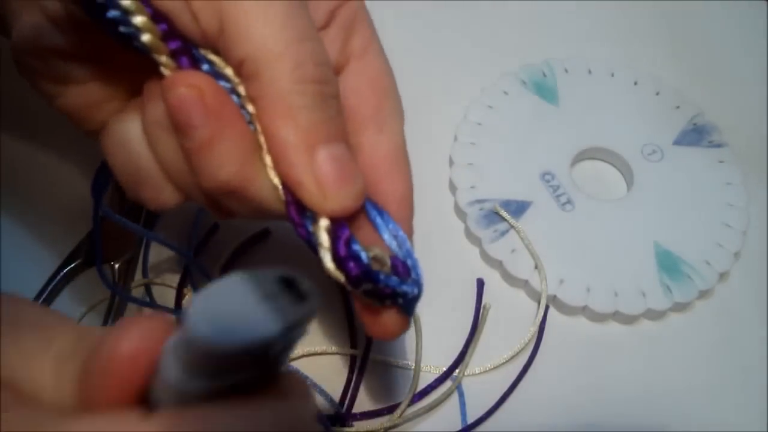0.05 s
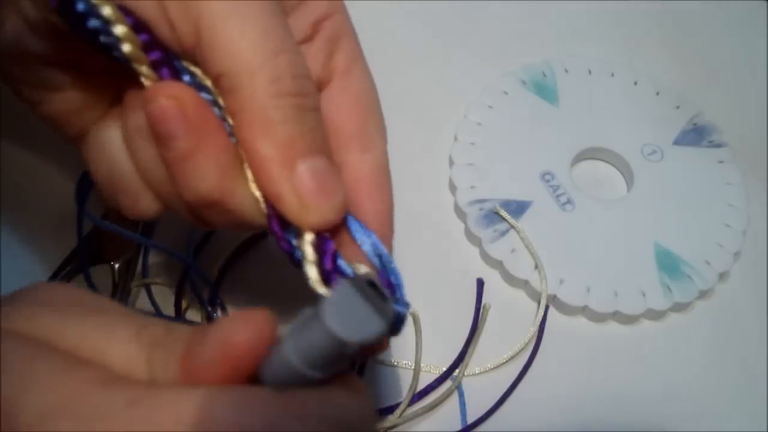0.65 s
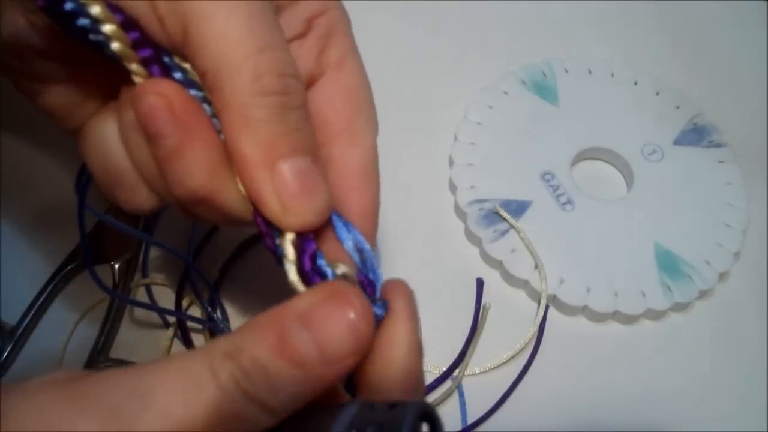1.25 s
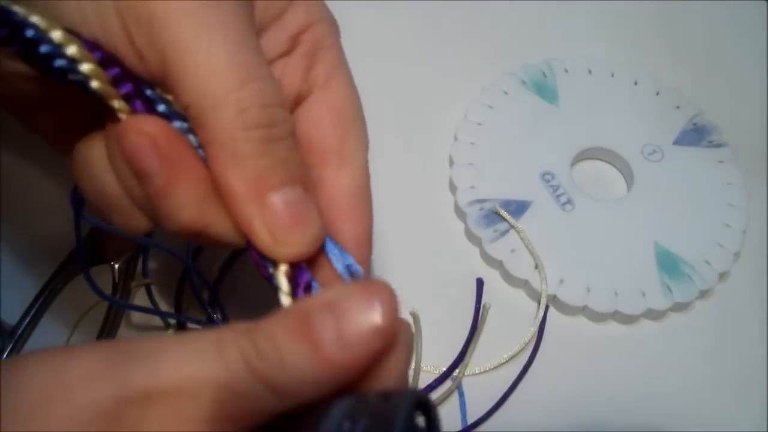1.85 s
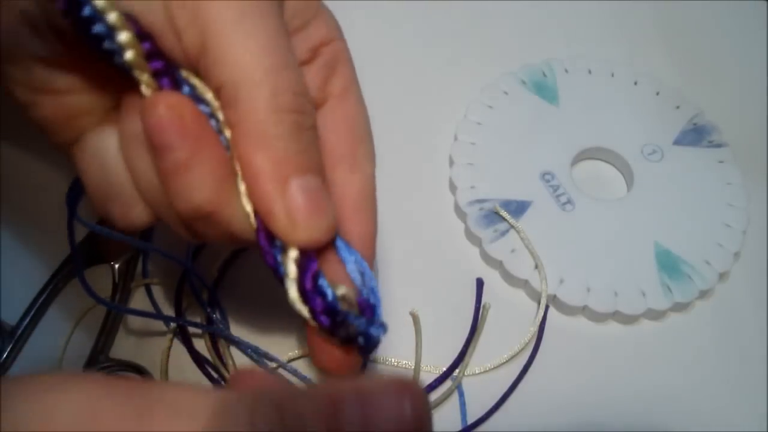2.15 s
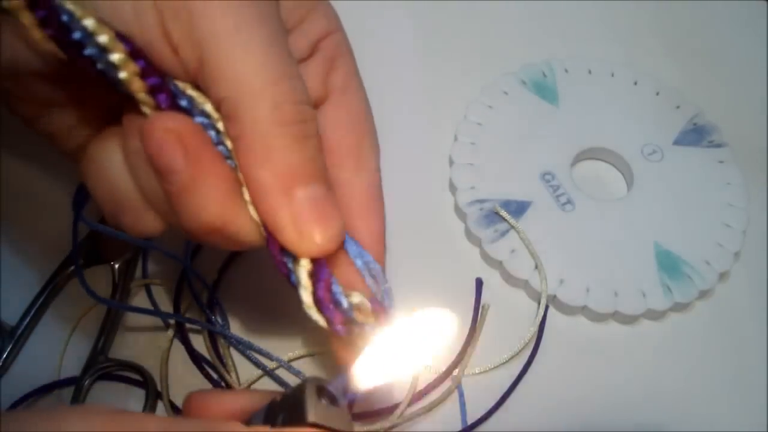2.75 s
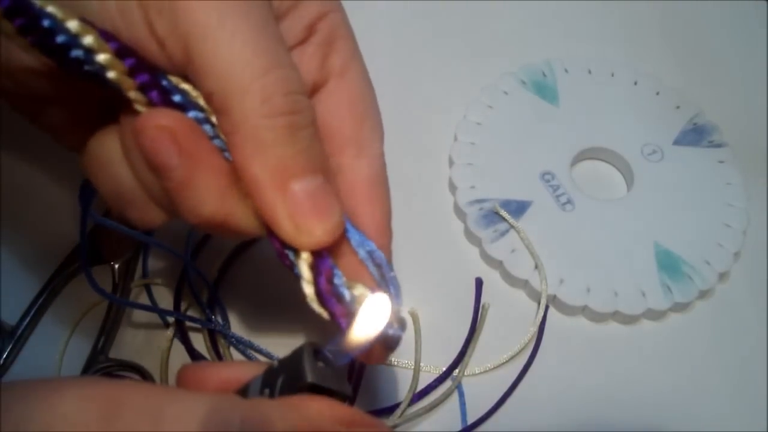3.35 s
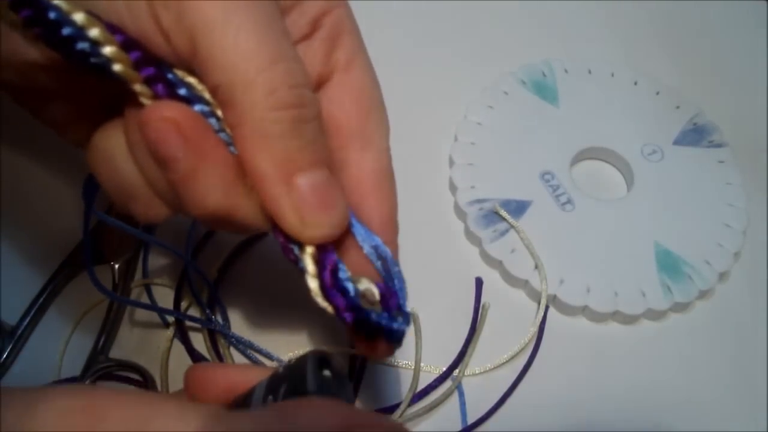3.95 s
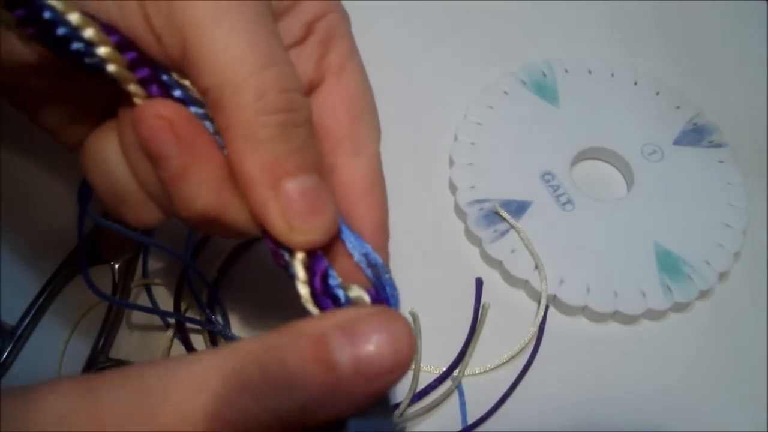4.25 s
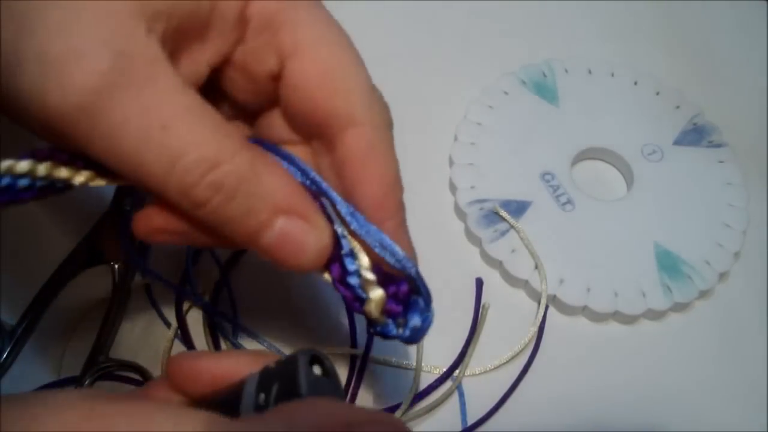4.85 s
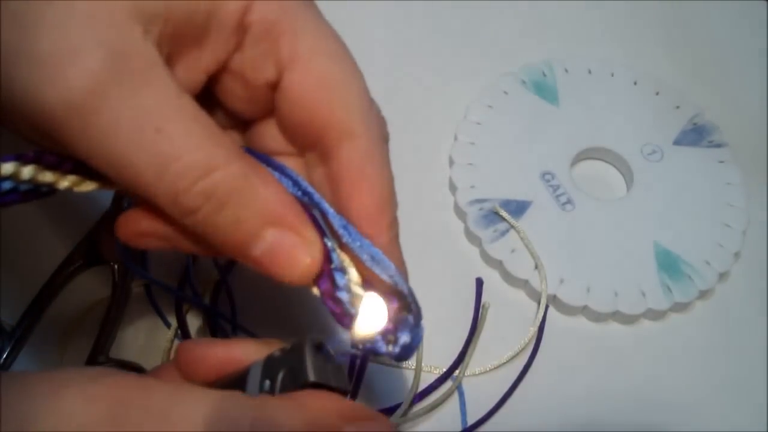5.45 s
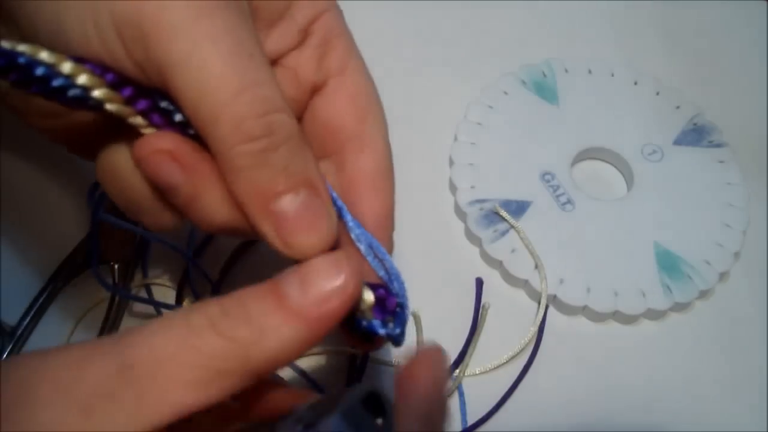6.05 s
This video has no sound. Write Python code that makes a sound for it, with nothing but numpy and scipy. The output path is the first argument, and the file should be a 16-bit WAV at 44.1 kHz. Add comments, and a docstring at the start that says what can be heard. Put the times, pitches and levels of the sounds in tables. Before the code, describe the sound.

A lighter ticks in the fingers and snaps alight twice, each time catching with a soft puff before its lever clicks back.

```python
"""Over the hush of a small room, a plastic case ticks and rubs in the fingers close to the microphone:
a piezo lighter, used to melt the ends of a braided cord. Twice the valve releases a hissing jet, the
igniter's hammer strikes its crystal hard enough to overload the microphone, the gas catches with a soft
puff, and a spring clicks the lever back up. The impacts sound through the resonances of the body,
the rubs through stick-slip friction, and the flame through the air it displaces."""
import sys
import numpy as np
from scipy import signal
from scipy.fft import rfft, irfft, next_fast_len
from scipy.io import wavfile

SR = 44100
rng = np.random.default_rng(int(sys.argv[2]) if len(sys.argv) > 2 else 0)


def dump(signal):
    """Clip the signal to [-1, 1] and save it as 16-bit WAV at the path in sys.argv[1]."""
    limited = np.clip(np.atleast_2d(signal).T, -1, 1)
    pcm = np.round(limited * 32767).astype(np.int16)
    wavfile.write(sys.argv[1], SR, pcm)


N = 268657
TIME = np.arange(N) / SR
AGE = TIME[:SR // 2]   # time since the onset of one short sound

# knocks of the case in the hand: start_s, level_db, low_mid_db, treble_db, rattle_db, resonance_hz
CASE_KNOCKS = [(0.2233, -41, 5, 1, 2, 4900), (0.2291, -35.5, -1, 3.5, 1, 4570),
               (0.3348, -43, 2.5, 0, 3, 2230), (0.4732, -43.5, 3, -13, -11, 4320),
               (0.501, -25, -2.5, 3, 3, 4630), (0.5349, -43, -4, -4, -14, 5070),
               (0.5736, -43, -2, -3, -5, 4410), (0.5916, -40.5, -1, -17, -0.5, 4900),
               (0.676, -33, 0, 0.5, -7, 4630), (0.715, -23, -2, 3.5, 0, 2140),
               (0.7425, -38, -15, -16, -6, 5030), (0.7632, -40, 9, -14, -12, 2850),
               (0.8776, -31.5, -4, -1, -1.5, 4600), (0.9072, -22, 1, 3.5, -2, 2290),
               (0.9656, -40, 13, -2, -5, 2740), (0.9787, -40.5, 5, 5, -4, 4960),
               (1.031, -42.5, 0, 4, 8, 4070), (1.0377, -34.5, 4.5, 4, 0, 6030),
               (1.0519, -26.5, -5.5, -2, 0, 6900), (1.6921, -46, 5, 5.5, -2, 4800),
               (1.9701, -28.5, -3, 6, -0.5, 4340), (1.997, -42.5, -2, -3, 1.5, 4770),
               (2.1484, -49, 11, -1, -20, 2330), (2.1685, -39, -9, 5, -3, 4200),
               (2.2588, -40, -8, 0.5, -6, 5160), (2.3584, -39.5, 2, -8, -6, 2420),
               (2.5756, -41, 0.5, -2, -11, 2730), (2.6155, -48.5, 10, -6, -7, 2950),
               (2.6421, -37.5, 16, -13, -2, 2720), (3.0007, -43.5, 5, -10, -4, 3420),
               (3.0094, -27.5, -0.5, 0.5, -2.5, 6440), (3.2415, -49.5, 13, -3.5, -3.5, 2230),
               (4.1361, -24.5, 1.5, -5, -4, 3070), (4.1383, -24.5, 2.5, -3.5, -4, 5210),
               (4.1545, -36, -7, 1, -8, 4930), (4.298, -40, 9, -7.5, -15, 3280),
               (4.375, -47, 11.5, -9.5, -21, 2430), (4.483, -38.5, 2.5, -9.5, -10.5, 3400),
               (4.6625, -36, 9, 4, -6, 2670), (4.682, -40, -3, -1.5, 1.5, 5020),
               (4.792, -39.5, -2.5, -7, -2, 5350), (5.0297, -46, 6, -2, 1.5, 4900),
               (5.407, -29.5, 0.5, -1, -4, 2300), (6.058, -35.5, -15, -16, -14, 5120),
               (6.0742, -39, 0, -3, -8, 5040), (6.0884, -29.5, -2, -1, 0, 3420)]
# touches on the metal hood: start_s, gain_db
HOOD_TOUCHES = [(0.23, -4), (1.048, 14)]
# fingers sliding on the case: peak_s, level_db, length_s, rasp_hz
FINGER_RUBS = [(0.322, -56.5, 0.18, 2400), (0.56, -60, 0.13, 4900), (0.78, -60, .2, 4300),
               (0.91, -32.5, 0.013, 2940), (1.0, -58, 0.21, 5000), (1.505, -54, 0.14, 2300),
               (1.83, -59.5, .3, 2350), (1.99, -54, 0.078, 4800), (2.18, -60.5, 0.47, 2380),
               (2.26, -53, 0.043, 5000), (2.376, -39, 0.053, 5000), (2.673, -50, 0.22, 2935),
               (3.22, -69.5, .5, 2245), (4.674, -42, .075, 4906), (4.796, -52.5, .065, 5240),
               (5.035, -58, .06, 2400), (5.092, -49.5, .14, 3410), (6.085, -47, .14, 3400)]
# fingertips pinching the frayed cord: peak_s, level_db, length_s
CORD_PINCHES = [(1.3, -56, .36), (1.44, -57.5, 0.12), (1.69, -63, .3), (1.975, -51, 0.076),
                (2.37, -44.5, 0.11)]
# openings of the gas valve: start_s, spit_db, spit_t60_s, surge_db, surge_t60_s
VALVE_OPENINGS = [(2.7165, -32.5, .06, -46.5, .18), (5.1312, -28, 0.032, -56.5, .7)]
# hammer blows and the mode the grip leaves free: start_s, level_db, t60_s, mode_hz, mode_db
HAMMER_STRIKES = [(2.8133, 5, 0.036, 6320, -11), (5.2565, 6.5, 0.038, 2230, -16.5)]
# pops of catching gas: start_s, level_db, brightness_hz
IGNITION_POPS = [(2.8489, -21, 600), (2.855, -29.5, 600), (2.8636, -30, 900), (5.306, -35.5, 451),
                 (5.3152, -33.5, 500)]
# oscillations of the young flame: start_s, level_db, pitch_hz, t60_s
FLAME_FLUTTER = [(2.846, -51.5, 69.6, 0.44), (5.306, -31.5, 60, 0.4), (5.308, -33.5, 101, 0.3)]
# air moved as the flame catches, leans on the cord or goes out: peak_s, level_db, length_s
FLAME_GUSTS = [(2.89, -56, .25), (3.22, -57.5, .25), (4.068, -43.5, .085), (5.318, -45.5, .08),
               (5.455, -53, .2), (6.015, -52, 0.077)]
# returns of the lever: start_s, level_db, low_mid_db, treble_db, rattle_db
LEVER_RETURNS = [(4.0653, -14.5, 0.5, -2, -3.5), (6.0029, -11, 1, -1.5, -9.5)]

# steady background hum: pitch_hz, rms_db
HUM_TONES = [(225, -72), (54.2, -80)]
# modes of the metal hood: pitch_hz, level_db, t60_s
METAL_HOOD_MODES = [(4120, -40, .075), (4950, -42, .04), (6950, -43, .045), (7150, -35, .022),
                    (7450, -36, .02), (11900, -44, .025)]
# modes of the whole lighter: pitch_hz, level_db, t60_s
BODY_MODES = [(2200, -5, .06), (2480, -5, .025), (3245, -5, .06), (3420, -5, .06), (4140, -1, .06),
              (4298, 1, .05), (4550, -3, .05), (5110, -4, .05), (5400, -2, .06), (5650, -4, .06),
              (6195, -3, .05), (6740, -4, .06), (9600, -7, .05), (9850, -7, .05), (11600, -8, .05)]
# hollow ring after a pop: pitch_hz, level_db, t60_s
POP_MODES = [(268, -16.5, 0.067), (315, -21, .12), (368, -19.5, 0.14)]
# modes of the lever, damped by the thumb: pitch_hz, level_db, t60_s
DAMPED_LEVER_MODES = [(1550, -8, .02), (2300, -3, .025), (2520, 0, .03), (3350, -4, .025), (4300, -1, .035),
                      (5200, -2, .03), (5450, -1, .03), (9750, -7, .035), (10050, -10, .03)]
# low modes of the body, jolted as the lever stops: pitch_hz, level_db, t60_s
JOLT_MODES = [(150, -27, .04), (326, -36, 0.035)]

# noise spectrum of room and microphone: frequency_hz, density_db
HUSH_SPECTRUM = [(12, -30), (20, -2.5), (107, -6.5), (198, -9), (228, -5), (255, -10), (434, -11.5),
                 (513, -14.5), (574, -14.5), (897, -15.5), (976, -16), (1120, -16.5), (2260, -20),
                 (12400, -23.5), (16000, -25.5)]
# spectrum of the knocked case: frequency_hz, density_db
CASE_SPECTRUM = [(100, -22.5), (600, -26.5), (1200, -22.5), (1700, -12.5), (2300, -2.5), (3200, -5),
                 (4300, -4), (5300, 0), (6500, -8.5), (8500, -13.5), (11500, -5), (14000, -10),
                 (16000, -16)]
# spectrum of skin rubbing on plastic: frequency_hz, density_db
SKIN_SPECTRUM = [(100, -23), (1200, -21.5), (2300, -1.5), (3300, -0.5), (4200, -10), (5200, 1),
                 (6500, -7.5), (8500, -11.5), (12000, -10), (16000, -21)]
# spectrum of the cord's fibres: frequency_hz, density_db
FIBRE_SPECTRUM = [(100, -18), (1500, -14), (2400, -1), (5000, 6), (8000, -3), (12000, 3), (16000, -3)]
# spectrum of the valve's spit: frequency_hz, density_db
SPIT_SPECTRUM = [(100, -13), (700, -10.5), (1200, 1.5), (2300, 0.5), (3300, -11.5), (4800, -5), (6500, -11),
                 (9500, -10), (12300, 3), (14000, -2.5), (16000, -13.5)]
# spectrum of the gas jet: frequency_hz, density_db
JET_SPECTRUM = [(100, -40.5), (6000, -28), (10500, -16.5), (12400, -3), (13500, -10.5), (16000, -22)]
# spectrum of the hammer's chatter: frequency_hz, density_db
HAMMER_SPECTRUM = [(40, -23.5), (190, -23), (400, -15), (750, -27.5), (1100, -21.5), (1800, -14.5),
                   (2300, -9), (2900, -10), (3400, -3.5), (4300, 2.5), (5300, -2.5), (6700, 0.5),
                   (7800, -12.5), (9800, -4), (12000, -6.5), (16000, -12)]
# reverberation time of the room: frequency_hz, t60_s
ROOM_DECAY = [(150, 0.34), (1000, 0.067), (2500, .26), (5000, 0.26), (9000, .28), (15000, .22)]


def from_db(db):
    """Amplitude ratio of a level in decibels."""
    return 10 ** (np.asarray(db) / 20)


def unit(x):
    """Normalisation to rms 1."""
    return x / np.sqrt(np.mean(x ** 2) + 1e-20)


def at_hz(points, hz):
    """Interpolation on a logarithmic frequency axis."""
    frequencies, values = np.transpose(points)
    return np.interp(np.log(hz + 1), np.log(frequencies), values)


def coloured(x, spectrum, low_db=0, treble_db=0, peak_hz=1000, peak_db=0):
    """Minimum-phase filtering by a spectrum, two shelves and a broad resonance, at unit power gain."""
    size = 2 * next_fast_len(len(x))
    hz = np.arange(size // 2 + 1) * SR / size
    shelves = [(2600, low_db), (3800, 0), (6300, 0), (8800, treble_db)]
    peak = peak_db / (1 + ((hz / peak_hz - 1) / .11) ** 2)
    magnitude = unit(from_db(at_hz(spectrum, hz) + at_hz(shelves, hz) + peak))
    cepstrum = irfft(np.log(magnitude))
    cepstrum[1:size // 2] *= 2   # folding onto positive time makes the filter causal
    cepstrum[size // 2 + 1:] = 0
    return irfft(rfft(x, size) * np.exp(rfft(cepstrum)))[:len(x)]


def add(out, start_s, sound):
    """Superposition of a sound onto the mix from start_s on."""
    i = max(round(start_s * SR), 0)
    out[i:i + len(sound)] += sound[:max(N - i, 0)]


def burst(t60, grain_db=0):
    """Exponential decay of dense micro-impacts, toneless because their spectrum is flattened; energy 1."""
    fade = from_db(-60 * AGE / t60)
    impacts = rng.standard_normal(len(AGE)) * from_db(grain_db * rng.standard_normal(len(AGE))) * fade
    flattened = irfft(np.exp(1j * np.angle(rfft(impacts))), len(AGE))
    x = flattened * fade ** (1 / 4)
    return x / np.sqrt(np.sum(x ** 2))


def ringing(modes):
    """Free vibration: each mode is a damped sine whose strength and sign vary from blow to blow."""
    out = np.zeros(len(AGE))
    for hz, db, t60 in modes:
        envelope = from_db(db + 1.5 * rng.standard_normal() - 60 * AGE / t60)
        out += envelope * rng.choice([-1, 1]) * np.sin(2 * np.pi * hz * AGE)
    return out


def contact(rattle_db, rattle_t60, chatter=.8, chatter_t60=.008):
    """Impact excitation: an impulse, its short chatter, and a longer rattle of loose parts."""
    touch = chatter * burst(chatter_t60, grain_db=8)
    touch[0] += 1
    rattle = from_db(rattle_db) * burst(rattle_t60, grain_db=4) * (1 - np.exp(-AGE / .0015))
    span = .003 * SR   # the touch carries about the energy of 3 ms at rms 1
    return (touch / np.sqrt(1 + chatter ** 2) + rattle) * np.sqrt(span)


def stroke(t, peak_s, db, length_s, swell_share=.43, edge_db=20.5):
    """Envelope of one movement: exponential rise and fall, edge_db down at both ends of its length."""
    distance = np.maximum((peak_s - t) / swell_share, (t - peak_s) / (1 - swell_share)) / length_s
    return from_db(db - edge_db * np.minimum(distance, 10))


def strokes(rows):
    """Summed envelope of a series of movements."""
    return sum(stroke(TIME, peak_s, db, length_s) for peak_s, db, length_s, *_ in rows)


def background(hush_db=-56):
    """The noise floor: a steady broadband hush of room and microphone, with a faint hum."""
    hum = sum(from_db(db) * np.sqrt(2) * np.sin(2 * np.pi * hz * TIME) for hz, db in HUM_TONES)
    return from_db(hush_db) * unit(coloured(rng.standard_normal(N), HUSH_SPECTRUM)) + hum


def case_ticks(gain_db=1, rattle_t60=.056, resonance_db=6, rebound_s=.0058, rebound_db=-6):
    """Impacts on nails and cord excite a local resonance of the case, which rebounds once, thinner."""
    out = np.zeros(N)
    for start_s, db, low_db, treble_db, rattle_db, hz in CASE_KNOCKS:
        tick = coloured(contact(rattle_db, rattle_t60), CASE_SPECTRUM,
                        low_db, treble_db, peak_hz=hz, peak_db=resonance_db)
        rebound = coloured(contact(rattle_db, rattle_t60), CASE_SPECTRUM,
                           low_db - 2.5, treble_db, peak_hz=4650, peak_db=resonance_db)
        add(out, start_s, from_db(db + gain_db) * tick)
        # the more the case rattles, the stronger its rebound
        add(out, start_s + rebound_s, from_db(db + rattle_db + rebound_db) * rebound)
    return out


def hood_rings():
    """Modal ringing: a touch sets the metal hood vibrating at its high natural frequencies."""
    out = np.zeros(N)
    for start_s, db in HOOD_TOUCHES:
        add(out, start_s, from_db(db) * ringing(METAL_HOOD_MODES))
    return out


def rubbing(slips_per_s=2500, smooth=.62, thumb_db=-51, thumb_s=.22, skid_db=-18, skid_s=.011):
    """Stick-slip friction of skin on plastic: grains over a smooth hiss, each rub with its own rasp."""
    slips = (rng.random(N) < slips_per_s / SR) * rng.standard_normal(N)
    friction = unit(unit(slips) + smooth * rng.standard_normal(N))
    # the thumb eases off the lever, and the surfaces skid just before each knock or lever return
    pressure = strokes([(return_s, thumb_db, thumb_s) for return_s, *_ in LEVER_RETURNS])
    for start_s, db, *_ in [*CASE_KNOCKS, *LEVER_RETURNS]:
        add(pressure, start_s - skid_s, stroke(AGE, skid_s, db + skid_db, skid_s))
    out = pressure * coloured(friction, SKIN_SPECTRUM)
    for peak_s, db, length_s, rasp_hz in FINGER_RUBS:
        near = np.abs(TIME - peak_s) < length_s
        rasp = coloured(friction[near], SKIN_SPECTRUM, peak_hz=rasp_hz, peak_db=6)
        out[near] += stroke(TIME[near], peak_s, db, length_s) * rasp
    return out


def snags(snags_per_s=14, over_rub_db=6.5):
    """A Poisson process: a sliding finger catches at random moments and the case ticks faintly."""
    catches = (rng.random(N) < snags_per_s / SR) * strokes(FINGER_RUBS)
    tick = coloured(contact(rattle_db=-7, rattle_t60=.04), CASE_SPECTRUM, peak_hz=4500, peak_db=5)
    return from_db(over_rub_db) * signal.fftconvolve(catches, tick)[:N]


def cord_rustle():
    """Friction among the cord's fibres gives a bright noise that swells with each pinch."""
    return strokes(CORD_PINCHES) * coloured(rng.standard_normal(N), FIBRE_SPECTRUM)


def gas(spit_rise_s=.00093, jet_db=-70, jet_rise_s=.012, close_t60=.1):
    """Turbulent jet noise: the valve spits, the flow surges, then hisses thinly until the lever returns."""
    spits, flow = np.zeros(N), np.zeros(N)
    for (open_s, db, t60, surge_db, surge_t60), (shut_s, *_) in zip(VALVE_OPENINGS, LEVER_RETURNS):
        envelope = from_db(db - 60 * AGE / t60) * (1 - np.exp(-AGE / spit_rise_s))
        add(spits, open_s, coloured(envelope * rng.standard_normal(len(AGE)), SPIT_SPECTRUM))
        since_open, since_shut = np.maximum(TIME - open_s, 0), np.maximum(TIME - shut_s, 0)
        opening = (1 - np.exp(-since_open / jet_rise_s)) * from_db(-60 * since_shut / close_t60)
        surge = from_db(surge_db - 60 * since_open / surge_t60)
        flow += opening * (from_db(jet_db) + surge)
    return spits + flow * coloured(rng.standard_normal(N), JET_SPECTRUM)


def igniter(slide_db=-36, rise_s=.00031, ring_db=-24, afterring_db=-48.5, afterring_t60=.21):
    """Impact and recoil: the hammer slips its catch, chatters on the crystal and excites the body."""
    out = np.zeros(N)
    recoil = (320, -15, .013)   # a dull knock: pitch_hz, level_db, t60_s
    metal_modes = [(hz, db, afterring_t60) for hz, db, _ in BODY_MODES]   # metal parts sing on faintly
    attack = 1 - np.exp(-AGE / rise_s)
    for start_s, db, t60, mode_hz, mode_db in HAMMER_STRIKES:
        slide = contact(rattle_db=-9, rattle_t60=.02, chatter=3, chatter_t60=.036)
        add(out, start_s - .002, from_db(slide_db) * coloured(slide, CASE_SPECTRUM))
        chatter = burst(t60) * np.sqrt(t60 * SR / np.log(1e6))   # starts near rms 1
        body = from_db(ring_db) * ringing(BODY_MODES) + ringing([(mode_hz, mode_db, t60), recoil])
        body += from_db(afterring_db) * ringing(metal_modes)
        add(out, start_s, from_db(db) * (coloured(chatter, HAMMER_SPECTRUM) + body) * attack)
    return out


def flame(rumble_hz=(25, 110)):
    """Thermal expansion: the gas catches in dull pops, the flame flutters and the moving air rumbles."""
    rumble_band = signal.butter(2, rumble_hz, "band", fs=SR, output="sos")
    out = strokes(FLAME_GUSTS) * unit(signal.sosfilt(rumble_band, rng.standard_normal(N)))
    for start_s, db, brightness_hz in IGNITION_POPS:
        swell = 2 * np.pi * brightness_hz * AGE
        pop = swell * (1 - swell / 3) * np.exp(1 - swell)   # a push of air, then a weaker pull
        add(out, start_s, from_db(db) * (pop + ringing(POP_MODES)))
    for start_s, db, hz, t60 in FLAME_FLUTTER:
        add(out, start_s, from_db(db - 60 * AGE / t60) * np.sin(2 * np.pi * hz * AGE))
    return out


def lever(ring_db=-14):
    """Damped vibration: the spring throws the lever against its stop; it rings and jolts the body."""
    out = np.zeros(N)
    for start_s, db, low_db, treble_db, rattle_db in LEVER_RETURNS:
        click = coloured(contact(rattle_db, rattle_t60=.052), CASE_SPECTRUM, low_db, treble_db)
        ring = from_db(ring_db) * ringing(DAMPED_LEVER_MODES)
        add(out, start_s, from_db(db) * (click + ring + ringing(JOLT_MODES)))
    return out


def room(x, delay_s=.0025, early_db=-12, early_t60=.072, tail_db=-20):
    """Reverberation: the desk reflects first, then each band's stored energy decays as diffuse noise."""
    out = from_db(early_db) * signal.fftconvolve(x, burst(early_t60, grain_db=7))[:N]
    edges_hz = [150, 450, 1000, 1900, 2800, 3800, 4800, 5900, 7100, 9200, 12500, 16000]
    white = rng.standard_normal((2, N))   # neighbouring bands get unrelated noise
    for k, (low, high) in enumerate(zip(edges_hz, edges_hz[1:])):
        band = signal.butter(2, [low, high], "band", fs=SR, output="sos")
        t60 = at_hz(ROOM_DECAY, np.sqrt(low * high))
        retained = from_db(-60 / (t60 * SR)) ** 2   # share of energy left after one sample
        energy = signal.lfilter([1 - retained], [1, -retained], signal.sosfilt(band, x) ** 2)
        out += from_db(tail_db) * np.sqrt(energy) * unit(signal.sosfilt(band, white[k % 2]))
    return np.r_[np.zeros(round(delay_s * SR)), out][:N]


def scene():
    """Superposition of the nearby sources, the room's response and the noise floor in two equal channels."""
    impacts = case_ticks() + hood_rings() + lever() + igniter()
    direct = impacts + gas() + rubbing() + cord_rustle() + snags()
    sound = direct + room(direct) + flame() + background()
    return np.array([sound, sound])


def record(dry, ceiling=.92, hiss_db=-84.5, cutoff_hz=15900):
    """Saturation rounds off the snaps; the left channel lags a sample, hiss is added and the top is cut."""
    left, right = dry / (1 + np.abs(dry / ceiling) ** 6) ** (1 / 6)
    hiss = from_db(hiss_db) * coloured(rng.standard_normal(N), HUSH_SPECTRUM)
    pair = np.array([np.r_[0, left[:-1]] + hiss, right - hiss])
    lowpass = signal.ellip(10, .2, 80, cutoff_hz, fs=SR, output="sos")
    return signal.sosfilt(lowpass, pair)


dry = scene()
out = record(dry)
dump(out)
```